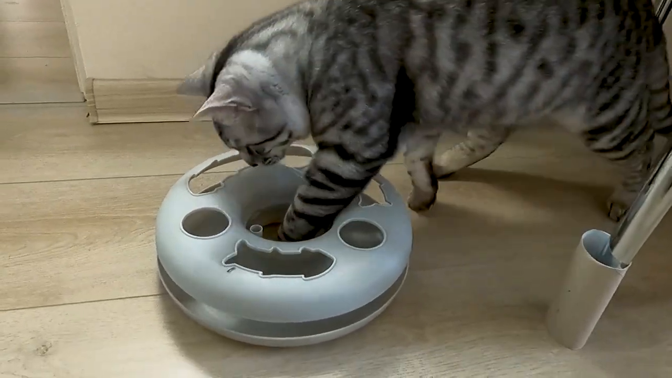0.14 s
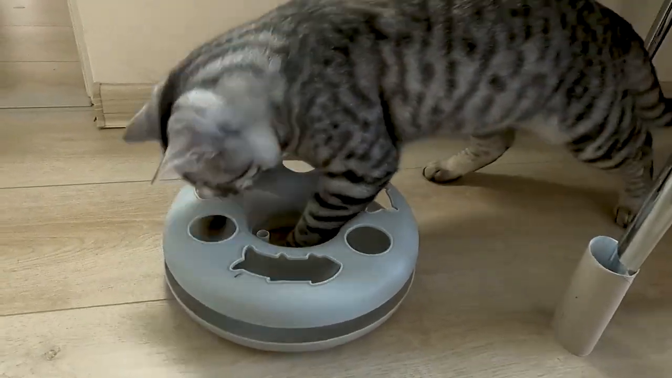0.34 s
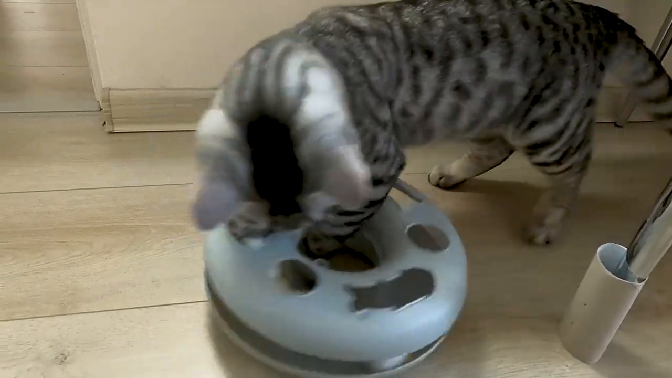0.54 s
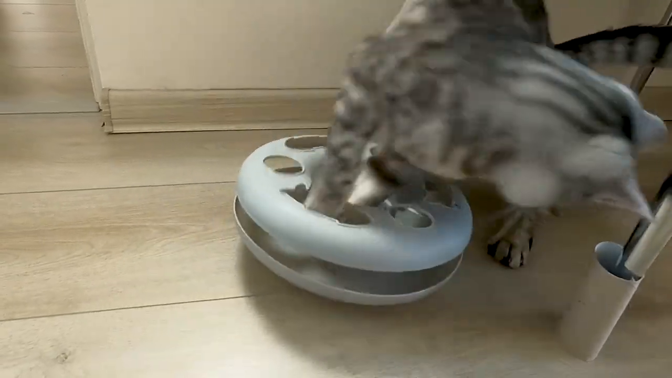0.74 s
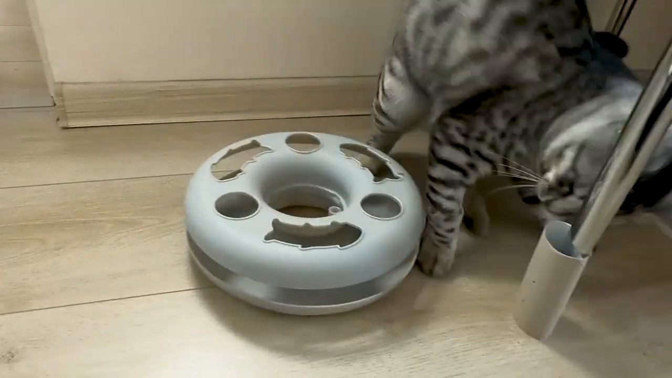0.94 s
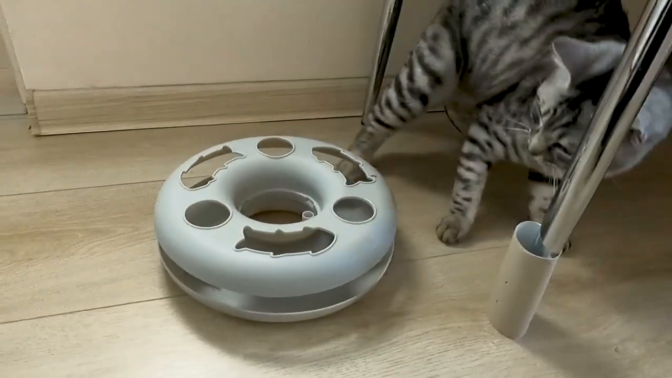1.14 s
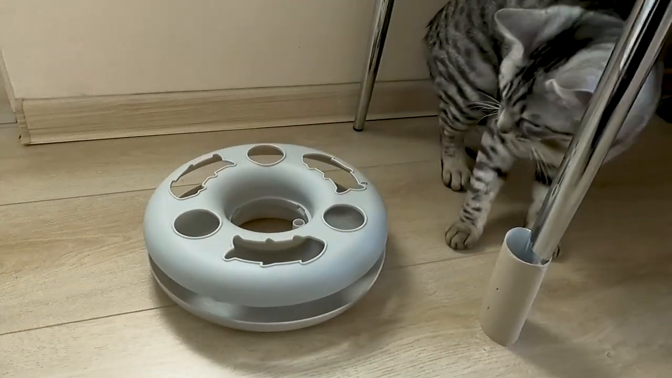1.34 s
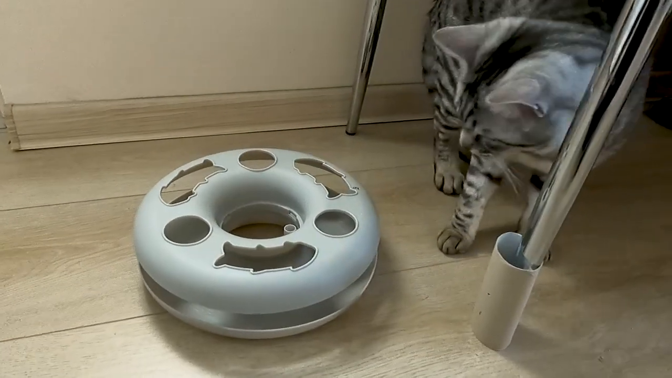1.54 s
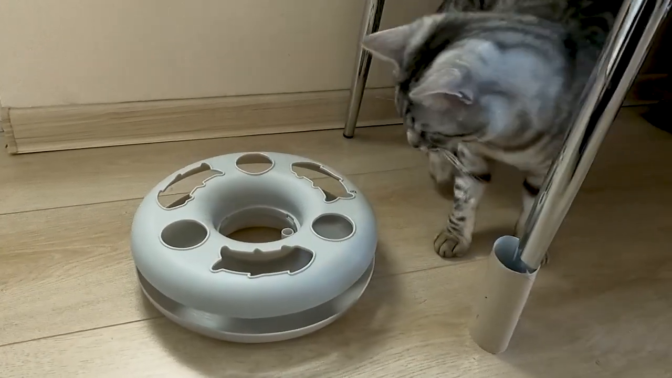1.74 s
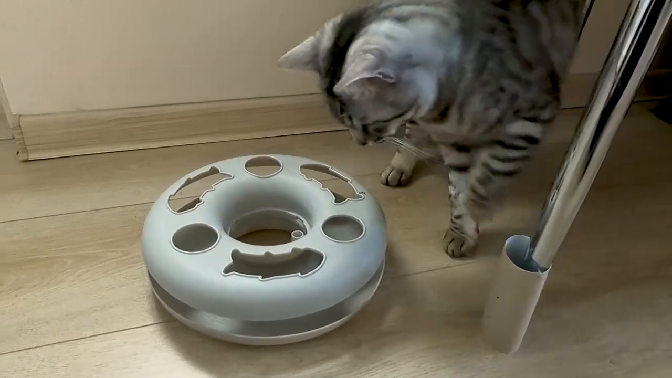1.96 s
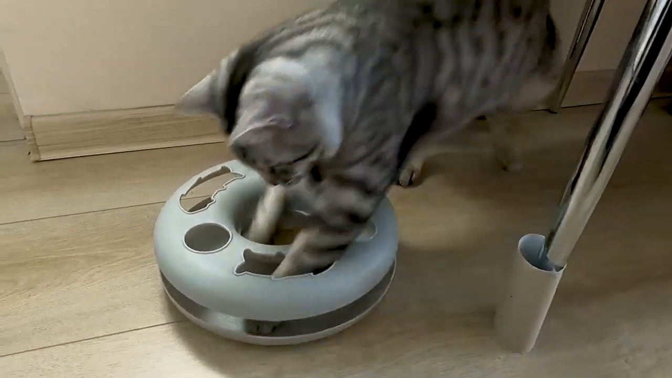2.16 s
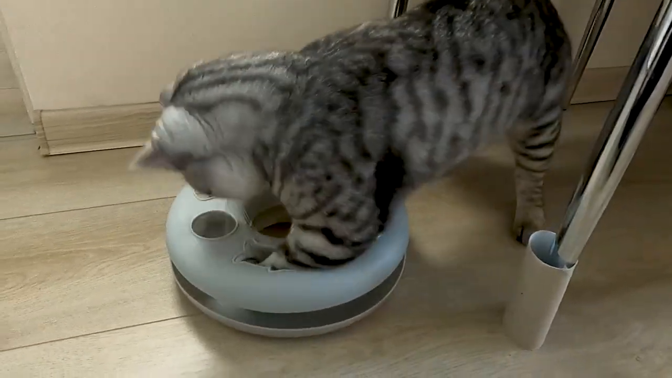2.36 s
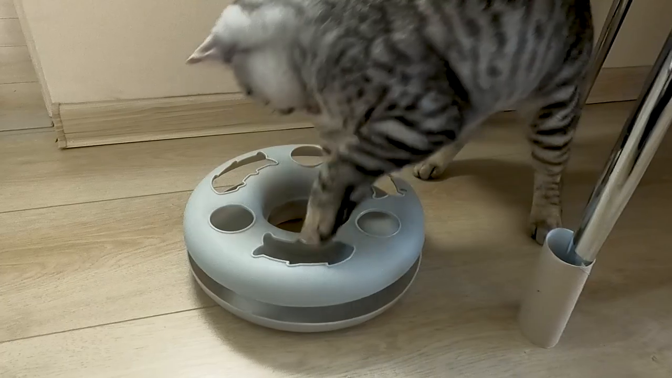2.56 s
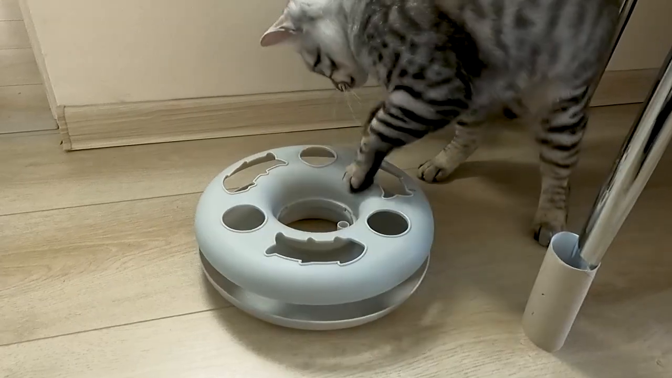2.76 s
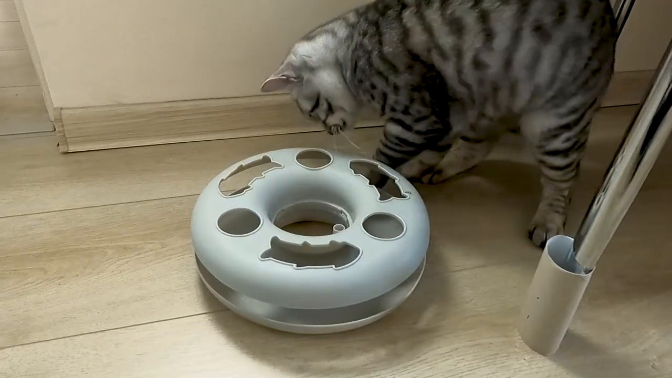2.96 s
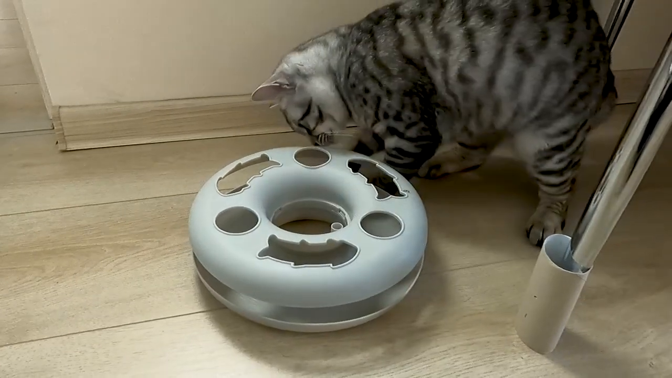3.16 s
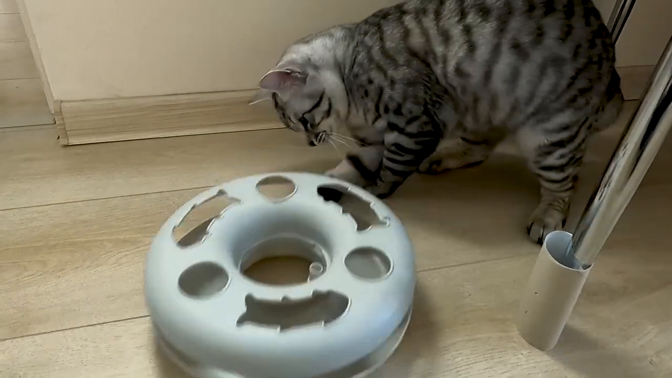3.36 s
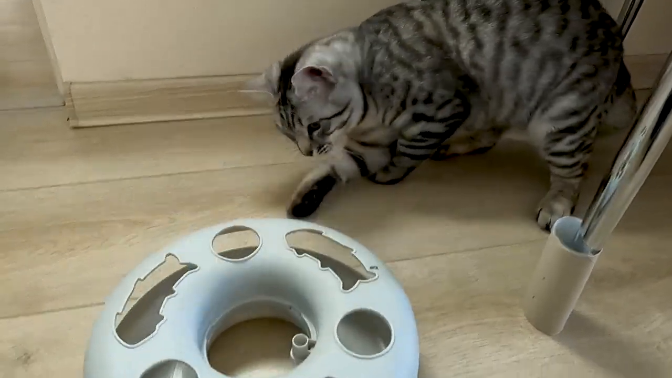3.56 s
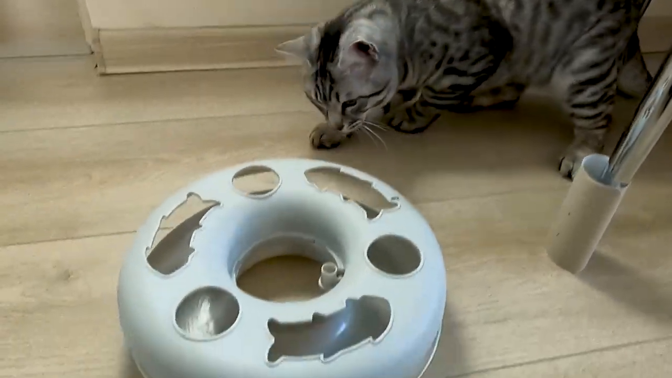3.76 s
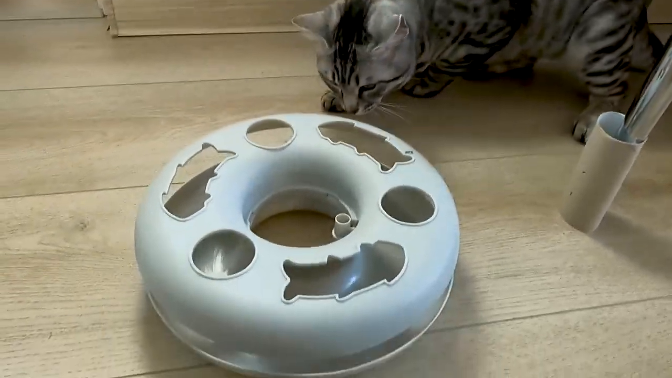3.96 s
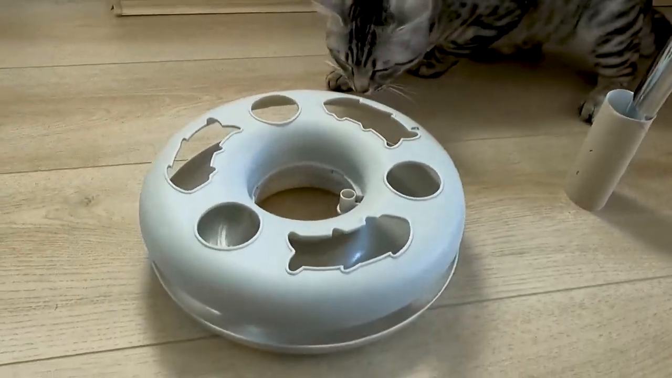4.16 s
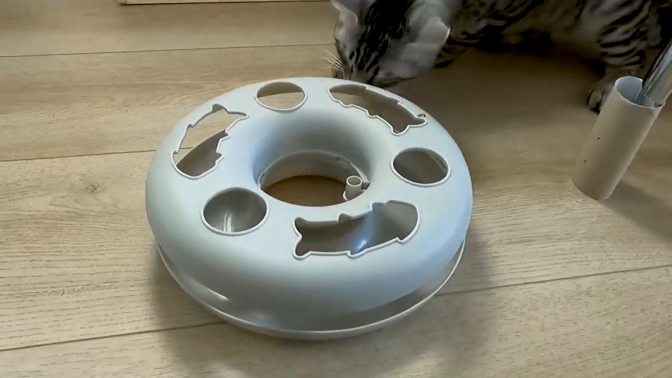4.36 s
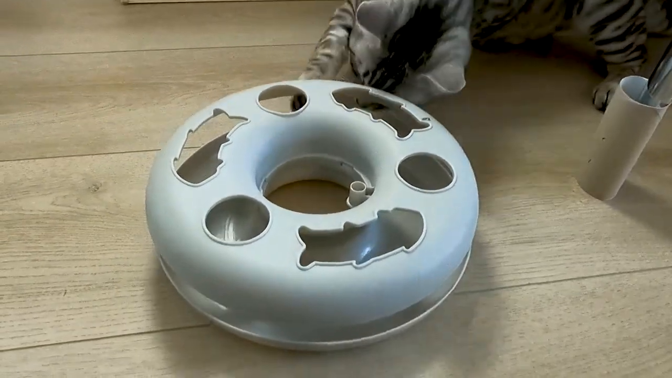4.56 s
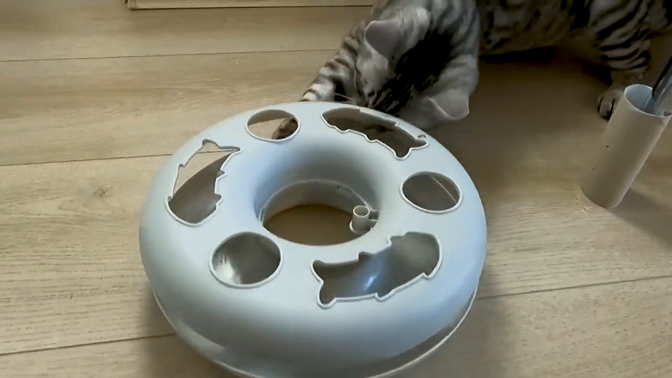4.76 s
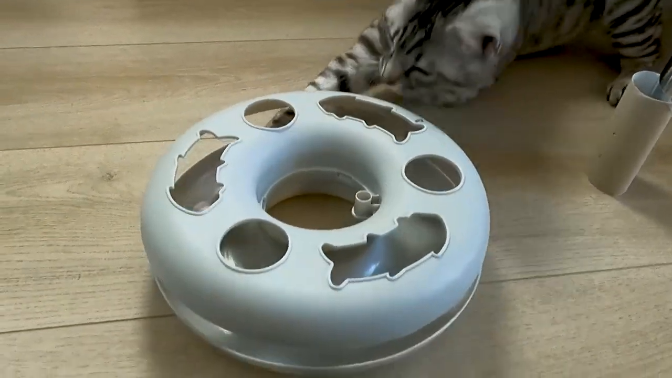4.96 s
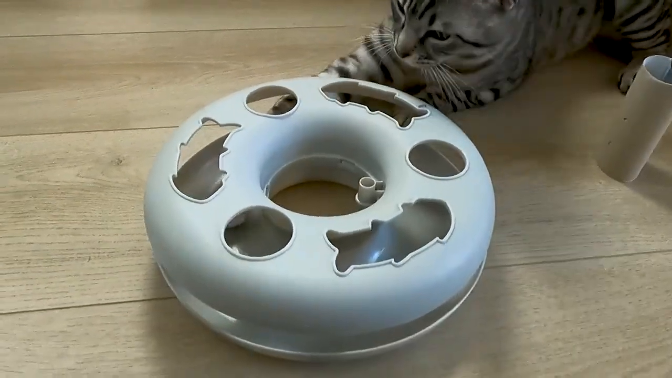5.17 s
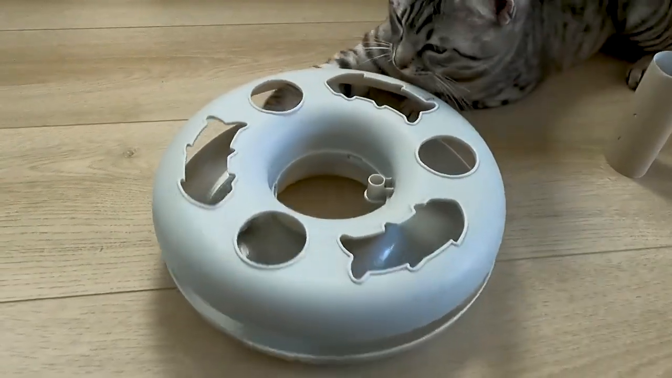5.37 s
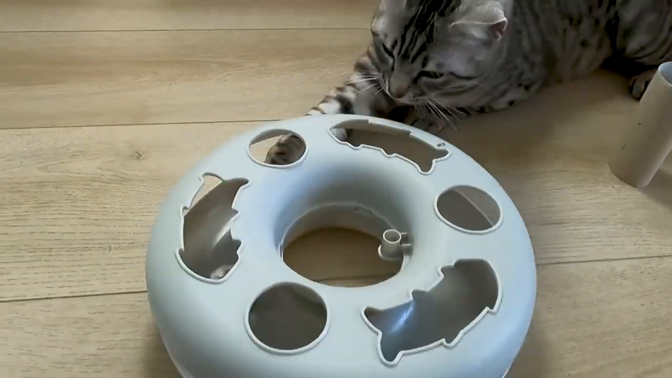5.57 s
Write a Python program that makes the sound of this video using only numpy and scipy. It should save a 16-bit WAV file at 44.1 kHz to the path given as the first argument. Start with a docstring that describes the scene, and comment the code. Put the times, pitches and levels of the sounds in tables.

```python
"""Cat and ball-track ring

A cat paws at a hollow plastic ring on a laminate floor: fur rustles, a pad squeaks, the shoved ring grates
and chirps. It clacks down, the ball rolls on and runs out, soft thuds sound in the boards, a small room rings.
Grating and ball rolls: random slips through filters and decaying modes. Knocks: pushes on shell modes plus
noise crackle. Chirps and squeaks: enveloped sines. Thuds: board modes. Room: decaying noise bands.
Air: filtered noise, hum."""
import sys
import numpy as np
from scipy import signal
from scipy.fft import rfft, irfft
from scipy.io import wavfile

SR = 44100
rng = np.random.default_rng(int(sys.argv[2]) if len(sys.argv) > 2 else 0)


def pcm_store(signal):
    """Save signal as 16-bit PCM."""
    levels = np.round(np.clip(np.atleast_2d(signal), -1, 1) * 32767)
    wavfile.write(sys.argv[1], SR, levels.astype(np.int16).T)


N = 247401
T = np.arange(N) / SR


def undb(db):
    """Decibels to gain."""
    return 10 ** (np.asarray(db) / 20)


def unit(x):
    """Scale to rms 1."""
    return x / np.sqrt(np.mean(x ** 2))


def add(track, start_s, sound):
    """Mix a sound into a track at start_s."""
    i = max(int(start_s * SR), 0)
    track[i:i + len(sound)] += sound[:N - i]


def colour(x, points):
    """Causal minimum-phase filter with the given (frequency [Hz], gain [dB]) outline."""
    hz, db = np.transpose(points)
    grid_hz = np.maximum(np.fft.rfftfreq(8192, 1 / SR), 1)
    gain = undb(np.interp(np.log(grid_hz), np.log(hz), db))
    cepstrum = irfft(np.log(gain))
    # fold the cepstrum onto positive time
    fold = 1 + np.sign(len(cepstrum) // 2 - np.arange(len(cepstrum)))
    fold[0] = 1
    response = irfft(np.exp(rfft(cepstrum * fold)))
    return signal.fftconvolve(x, response)[:len(x)]


def fade(t, t60):
    """Exponential decay, 60 dB down after t60."""
    return np.exp(-np.log(1000) * t / t60)


def walk(rate_hz):
    """Smooth random wander with a spread near 1."""
    knots = rng.standard_normal(4096)
    return np.interp(T * rate_hz, np.arange(len(knots)), knots) * np.sqrt(3 / 2)


def slips(rate_per_s, spread_db):
    """Dense tiny slips of uneven size and random sign, rms 1."""
    size = undb(spread_db * np.minimum(rng.exponential(size=N), 4))
    occurs = rng.random(N) < rate_per_s / SR
    return unit(occurs * size * rng.choice([-1, 1], N))


def ring(modes, scatter):
    """A body's answer to a tap; the place of the tap scatters the strength and phase of its modes."""
    t = T[:SR // 4]
    chance = scatter * rng.standard_normal((len(modes), 2))
    out = np.zeros(len(t))
    for (hz, t60_s, db), (gain, turn) in zip(modes, chance):
        out += undb(db + 2 * gain) * fade(t, t60_s) * np.cos(2 * np.pi * hz * t + turn)
    # little is radiated below the lowest mode
    highpass = signal.butter(1, modes[0][0] / 2, "high", fs=SR, output="sos")
    return signal.sosfilt(highpass, out)


# still-air spectrum: (frequency [Hz], relative level [dB])
AIR_SPECTRUM = [(20, -0.5), (50, -9.5), (90, -23.5), (160, -14.5), (260, -21.5), (450, -26), (900, -33.5),
                (1500, -34.5), (2500, -42.5), (4000, -43.5), (6500, -42.5), (8500, -49), (10500, -57.5),
                (15000, -69.5)]
AIR_RMS_DB = -64.5  # of the common part
# house hum: (frequency [Hz], mean level [dB])
HOUSE_HUM = [(156, -76.5), (716, -85)]


def air():
    """Quiet rumble and hiss as common and difference noise, with a slightly wavering hum."""
    mid = unit(colour(rng.standard_normal(N), AIR_SPECTRUM))
    side = unit(colour(rng.standard_normal(N), AIR_SPECTRUM))
    side = colour(side, [(60, -7.0), (200, -2.5), (1500, 1.0), (8000, -6.5)])
    hum = np.zeros(N)
    for hz, db in HOUSE_HUM:
        phase = 2 * np.pi * np.cumsum(hz + 6 * walk(rate_hz=40)) / SR
        hum += undb(db + 2 * walk(rate_hz=10)) * np.sin(phase)
    return undb(AIR_RMS_DB) * (mid + np.outer([1, -1], side)) + hum


# fur and paw-pad rustles: (time [s], length [s], level at the swell's top [dB])
FUR_RUSTLES = [(0.0, 0.49, -76), (0.473, 0.041, -62.5), (1.982, 0.075, -76), (2.171, .07, -72),
               (2.27, 0.079, -61), (2.732, 0.16, -56), (3.201, 0.087, -73)]


def rustles():
    """Fur brushes softly past the plastic: coloured dense slips under half-sine swells."""
    swell = np.zeros(N)
    for start_s, length_s, db in FUR_RUSTLES:
        swell += undb(db) * np.sin(np.pi * np.clip((T - start_s) / length_s, 0, 1))
    outline = [(200, 12.0), (1200, 7.5), (3000, -4.5), (6000, 5.5), (9000, -9.0), (15000, -20.5)]
    return swell * unit(colour(slips(rate_per_s=3300, spread_db=-1.0), outline))


# pad squeaks: (time [s], length [s], mean pitch [Hz], mean level [dB])
PAD_SQUEAKS = [(0.005, .085, 1040, -68), (0.355, .11, 1005, -63)]


def squeaks():
    """A pad dragged over smooth plastic sings on a rough, wavering pitch."""
    out = np.zeros(N)
    for start_s, length_s, hz, db in PAD_SQUEAKS:
        phase = 2 * np.pi * np.cumsum(hz * (1 + .03 * walk(rate_hz=600))) / SR
        swell = np.sqrt(np.sin(np.pi * np.clip((T - start_s) / length_s, 0, 1)).clip(0))
        tone = np.sin(phase) + undb(-24) * np.sin(2 * phase)
        out += undb(db + 2 * walk(rate_hz=60)) * swell * tone
    return out


def stroke(start_s, attack_s, hold_s, release_s):
    """Strength of one shove or ball roll: it builds smoothly, holds, and dies as the motion comes to rest."""
    rise = np.sin(np.pi / 2 * np.clip((T - start_s) / attack_s, 0, 1)) ** 2
    dying_s = np.maximum(T - start_s - attack_s - hold_s, 0)
    return rise * np.exp(-(dying_s / release_s) ** 2)


def shifting(x, depth_db, rate_hz):
    """The contact point wanders, so narrow treble bands swell and sink on their own: a rasp."""
    octave = np.log2(np.maximum(np.fft.rfftfreq(N, 1 / SR), 1))
    centres = np.arange(10.5, 13.8, 1 / 9)  # log2 of Hz
    spectrum = rfft(x)
    out = np.zeros(N)
    for k, share in enumerate(np.eye(len(centres))):
        band = irfft(spectrum * np.interp(octave, centres, share), N)
        # lowest band steady, second at half depth
        out += band * undb(depth_db * walk(rate_hz) * min(k / 2, 1))
    return out


# hollow-ring modes: (frequency [Hz], t60 [s], relative level [dB])
SHELL_MODES = [(173, 0.12, -19.5), (283.8, 0.036, -6), (395.5, 0.027, 8.5), (489, 0.061, -4.5),
               (555, 0.033, -3), (777, 0.038, -3), (920, 0.025, 6), (1056, 0.013, -9), (1226, 0.018, 3.5)]


def blow(contact_ms):
    """The shell's answer to one push (softer = longer = duller), peak 1."""
    push = np.sin(np.pi * np.minimum(1000 * T[:SR // 20] / contact_ms, 1)) ** 2
    out = signal.fftconvolve(ring(SHELL_MODES, scatter=0.98), push)
    out = colour(out, [(45, -14), (80, -8), (130, 2)])
    return out / np.abs(out).max()


RATTLE_PER_S = 45


def rattle():
    """The loose ball taps the shell equally hard at uneven moments, rms 1."""
    taps = np.zeros(N)
    for k, late in enumerate(rng.uniform(-1, 1, int(RATTLE_PER_S * N / SR))):
        add(taps, (k + late / 2) / RATTLE_PER_S, np.ones(1))
    out = signal.fftconvolve(taps, blow(contact_ms=.9))[:N]
    # so light a ball hardly stirs the bass
    return unit(colour(out, [(80, -11.5), (220, 0.5)]))


# shoves, and two short rolls of the ball (1.537, 5.347); part levels before the mix trims in sliding():
# (time [s], attack [s], hold [s], release [s], grating [dB],
# then re grating: shell drone [dB], rim [dB], ball track [dB], finest hiss [dB], boards [dB])
RING_MOTIONS = [(0.502, 0.0094, 0.054, 0.042, -32.5, -3.5, -11.5, -13, -10, -20.5),
                (0.561, 0.048, 0.013, 0.026, -27, -6.5, -36, -14, -15, -35),
                (0.606, .12, 0.083, 0.12, -23.5, -13, -59, -17, -5, -32),
                (1.537, 0.0047, 0.037, 0.025, -74, 13.5, -21.5, 2.5, -19.5, -1.5),
                (2.308, 0.0066, 0.066, 0.044, -42.5, -0.5, -10, -11, -14, -8),
                (2.425, 0.026, .015, 0.14, -57, 9.5, -10, -17, -13, -20),
                (2.63, 0.0038, 0.024, 0.025, -53.5, -2, -17, -18, -13, -18),
                (2.826, 0.0036, 0.0051, 0.056, -40, 1.5, -11, -17, -13, -30),
                (3.31, 0.15, 0.011, 0.078, -28.5, -8, -17, -13, -12.5, -43.5),
                (3.483, 0.078, 0.042, 0.061, -25.5, -13, -22.5, -14.5, -13, -48),
                (3.648, 0.037, 0.019, 0.068, -32, -5.5, -13.5, -9.5, -23, -24),
                (4.665, 0.015, 0.14, 0.033, -42, -1, -11.5, -11.5, -15, -0.5),
                (4.861, 0.032, 0.0037, 0.056, -30.5, -2.5, -11, -11.5, -11.5, -11.5),
                (5.157, 0.055, 0.018, 0.08, -53, 4.5, -13, -21, -16, -14),
                (5.347, .008, 0.12, .04, -70, 7.5, -6, -4, -9, 1),
                (5.461, 0.011, 0.037, 0.016, -53.5, 2, -9.5, -15, -25, -3),
                (5.496, 0.064, 0.11, .05, -30, -5, -6.5, -11.5, -8, -16.5)]
# grating spectrum: (frequency [Hz], relative level [dB])
GRATING_SPECTRUM = [(600, -37.5), (1000, -9), (1500, 3), (2200, 0.5), (3000, 3), (4000, 4.5), (5500, 5.5),
                    (7300, 3), (8500, -3.5), (11000, -17), (15000, -33)]
# finest-hiss spectrum: (frequency [Hz], relative level [dB])
HISS_SPECTRUM = [(5000, -17.5), (8000, -0.5), (10000, -2.5), (12500, -7.5), (14000, -18.5), (16000, -40.5)]
# rolling-ball spectrum, duller than the base: (frequency [Hz], relative level [dB])
ROLLING_SPECTRUM = [(400, -13), (1000, 4), (1700, -0.5), (3000, 0.5), (5500, 1), (8000, -8.5), (12000, -26)]
# rim modes: (frequency [Hz], t60 [s], relative level [dB])
RIM_MODES = [(1760, 0.0077, -2), (2230, 0.016, 1), (2342, 0.031, 3.5), (2810, 0.0038, -2.5)]
# ball-track air resonances: (frequency [Hz], t60 [s], relative level [dB])
TRACK_MODES = [(956, 0.042, -1.5), (1013, 0.024, 1.5)]
# floorboard modes, also for thuds(): (frequency [Hz], t60 [s], relative level [dB])
BOARD_MODES = [(81.4, .09, -6.5), (137, 0.0067, -2.5), (168, 0.029, -3.5)]
# ball rolls on after the landing; drone drive is before the mix trims
RUNOUT_START_S, RUNOUT_T60_S, RUNOUT_GRATE_DB, RUNOUT_DRONE_DRIVE_DB = 1.005, 0.74, -40.5, -37


def stir(friction, modes):
    """Friction rings a body's modes, rms 1."""
    return unit(signal.fftconvolve(friction, ring(modes, scatter=0))[:N])


def sliding():
    """Slips of base or rolling ball grate directly and stir shell, rim, ball track and boards."""
    drives = np.zeros((6, N))
    for start_s, attack_s, hold_s, release_s, db, *parts_db in RING_MOTIONS:
        strength = undb(db) * stroke(start_s, attack_s, hold_s, release_s)
        drives += np.outer(undb([0, *parts_db]), strength)
    grate, drone, sing, hollow, hiss, rumble = drives
    runout = (T > RUNOUT_START_S) * fade(np.abs(T - RUNOUT_START_S), RUNOUT_T60_S)
    drone = drone + undb(RUNOUT_DRONE_DRIVE_DB) * runout

    friction = slips(rate_per_s=6000, spread_db=1.5)
    friction = friction * undb(1.8 * walk(rate_hz=140) + 0.36 * walk(rate_hz=30))
    friction = shifting(friction, depth_db=3.7, rate_hz=45)

    # sideways slips mostly move the shell's middle modes
    outline = [(90, -12.5), (180, -2.0), (300, 1.5), (560, 2.5), (680, -5), (950, -1.0), (4000, -25.5)]
    shell = unit(colour(stir(friction, SHELL_MODES), outline))
    boards = stir(friction, BOARD_MODES)
    boards = unit(signal.fftconvolve(boards, np.hanning(SR // 180))[:N])  # soften

    out = undb(RUNOUT_GRATE_DB) * runout * unit(colour(friction, ROLLING_SPECTRUM))
    out += undb(-4.5) * grate * unit(colour(friction, GRATING_SPECTRUM))
    out += drone * (undb(-6.0) * shell + undb(-8) * rattle())
    out += sing * stir(friction, RIM_MODES)
    out += hollow * stir(friction, TRACK_MODES)
    out += undb(-8.0) * hiss * unit(colour(friction, HISS_SPECTRUM))
    out += undb(-4.0) * rumble * boards
    return out


# stick-slip chirps: (time [s], pitch [Hz], envelope peak [dB], t60 [s])
PLASTIC_CHIRPS = [(0.506, 1275, -26.5, 0.0063), (0.887, 1037, -23, 0.013), (0.8956, 1048, -12, 0.015),
                  (0.922, 908, -26.5, 0.019), (2.3125, 1080, -31.5, 0.0072), (3.923, 1206, -49.5, 0.009),
                  (4.6614, 3296, -21.5, 0.0033)]


def chirps():
    """Plastic sticks and slips for a few quick cycles that swell and die at once."""
    out, t = np.zeros(N), T[:SR // 10]
    for start_s, hz, db, t60_s in PLASTIC_CHIRPS:
        envelope = (1 - fade(t, t60_s * 1.7)) ** 2 * fade(t, t60_s)
        add(out, start_s, undb(db) * envelope / envelope.max() * np.sin(2 * np.pi * hz * t))
    return out


# ring on floor, paw and ball on ring: (time [s], shell peak [dB], crackle drive [dB], contact [ms])
RING_KNOCKS = [(0.511, -26.5, -51, 1.16), (0.552, -24, -40, 0.88), (0.608, -23, -29.5, 1.12),
               (0.627, -24.5, -15.5, 0.83), (0.703, -20, -24.5, 1.3), (0.823, -24, -36, 1.4),
               (0.9526, -7.5, -19.5, 1.11), (0.962, -4.5, -13.5, 0.98), (0.9924, -8, -14.5, 0.63),
               (1.041, -18.5, -40, 1.3), (1.063, -19.5, -50.5, 0.99), (1.201, -39, -44, 1.64),
               (1.267, -35.5, -43, 0.62), (1.283, -42.5, -47.5, 1.5), (1.328, -43, -47.5, 0.36),
               (1.362, -48, -51, 0.79), (1.538, -49.5, -59.5, 1.16), (2.319, -18, -30.5, 1.22),
               (2.386, -28, -44, 0.51), (2.434, -33.5, -50, 1.25), (2.495, -28.5, -41, 2.44),
               (2.634, -43, -46, 1.7), (2.7042, -31, -36, 0.82), (2.796, -49, -41.5, 1.2),
               (2.830, -31, -31.5, 1.2), (3.446, -29, -39, 1.04), (3.628, -29, -28, 1.35),
               (4.661, -49.5, -33, 0.44), (4.704, -43, -31, 2.4), (4.79, -27, -33.5, 2.9),
               (4.843, -28, -29, 3.9), (4.878, -31, -37, 3), (4.897, -22.5, -20.5, 2.3),
               (4.959, -28.5, -36.5, 2.5), (5.161, -35, -41.5, 1.0), (5.359, -34, -48, 1.43),
               (5.445, -40.5, -58, 1.8), (5.492, -29.5, -44, 2.1), (5.521, -34, -31, 0.59)]
# hard-contact spectrum: (frequency [Hz], gain [dB])
TICK_SPECTRUM = [(300, -11), (1000, 8.5), (1700, 3.5), (3000, 6), (6000, 3.5), (7500, -2.5), (9000, -10),
                 (12500, -15.5), (16000, -37)]
# rebound level re knock; cap on its shell peak, as the ball is light
REBOUND_DELAY_S, REBOUND_DB, REBOUND_CAP_DB = .031, -11, -33.5


def knocks():
    """Each contact pushes the shell and sets off a short noise crackle; the loose ball then hits back once."""
    body, ticks = np.zeros((2, N))
    t = T[:SR // 20]
    onset = np.minimum(t / .001, 1)
    crackle = onset * (fade(t, .016) + undb(-20.5) * fade(t, 0.06))
    for start_s, shell_db, tick_db, contact_ms in RING_KNOCKS:
        rebound_db = min(REBOUND_DB, REBOUND_CAP_DB - shell_db)
        for delay_s, db in (0, 0), (REBOUND_DELAY_S, rebound_db):
            add(body, start_s + delay_s, undb(shell_db + db) * blow(contact_ms))
            noise = rng.uniform(-1.8, 2.4, len(t))
            add(ticks, start_s + delay_s, undb(tick_db + db) * noise * crackle)
    return body + colour(ticks, TICK_SPECTRUM)


# floorboard thuds: (time [s], peak [dB])
BOARD_THUDS = [(0.608, -35), (0.963, -32), (0.991, -30.5), (1.055, -32.5), (2.007, -49), (2.026, -45),
               (2.056, -53.5), (2.321, -39), (2.387, -40.5), (3.724, -49), (3.782, -44.5), (3.815, -46.5),
               (4.189, -57.5), (4.529, -56), (4.876, -34.5), (5.032, -45.5)]


def thuds():
    """Paws and the rocking ring load the floorboards softly: smoothed taps on the board modes."""
    out = np.zeros(N)
    for start_s, db in BOARD_THUDS:
        thud = signal.fftconvolve(ring(BOARD_MODES, scatter=1), np.hanning(SR // 180))
        add(out, start_s, undb(db) * thud / np.abs(thud).max())
    return out


# room bands: (frequency [Hz], t60 [s], tail level re direct [dB], left-right difference re common part [dB])
ROOM_BANDS = [(83.2, 0.43, -17, -14.5), (169.9, 0.59, -2, -17), (380, 0.3, -11, -15),
              (1030, 0.55, -6.5, -7.5), (2534, 0.45, -6, -3), (6000, 0.49, -10, -3.5),
              (13000, 0.35, -11.5, -4.5)]


def room(x):
    """Diffuse echoes from close walls: noise bands, each with its own decay and stereo width."""
    hz, t60_s, db, side_db = np.transpose(ROOM_BANDS)
    t = T[:SR]
    log_hz = np.log(np.maximum(np.fft.rfftfreq(SR, 1 / SR), 1))
    noise = rfft(rng.standard_normal((2, SR)))
    build = np.clip((t - .002) / 0.0044, 0, 1)
    early_fade = undb(-7.5) * unit(fade(t, .03)) / np.sqrt(SR)
    response = np.zeros((2, SR))
    for k, share in enumerate(np.eye(len(hz))):
        mid, side = irfft(noise * np.interp(log_hz, np.log(hz), share), SR)
        width = undb(side_db[k])
        difference = width * np.outer([1, -1], side)
        pair = (mid + difference) / np.hypot(1, width)
        tail = build * fade(t, t60_s[k])
        response += undb(db[k]) * pair * tail / np.linalg.norm(tail)
        # floor and nearest wall answer first, opposite in sign at the two ports
        response += difference * early_fade
    return signal.fftconvolve(x[None], response, axes=1)[:, :N]


def scene():
    """The toy's direct sound reaches the left port a moment after the right one; room and air are added."""
    toy = rustles() + squeaks() + sliding() + chirps() + knocks() + thuds()
    lag_samples = .55
    delay = np.exp(-2j * np.pi * np.fft.rfftfreq(N) * lag_samples)
    left = irfft(rfft(toy) * delay, N)
    return np.array([left, toy]) + room(toy) + air()


TOP_HZ = 15300


def record(dry):
    """A steep elliptic low-pass cuts the top."""
    return signal.sosfilt(signal.ellip(8, .2, 70, TOP_HZ, fs=SR, output="sos"), dry)


dry = scene()
out = record(dry)
pcm_store(out)
```